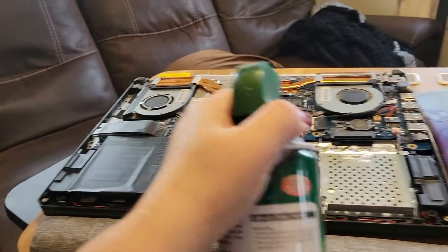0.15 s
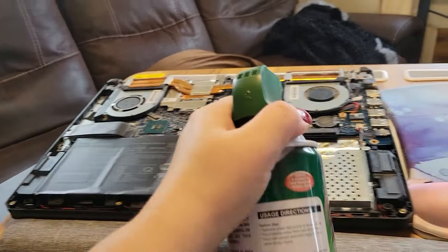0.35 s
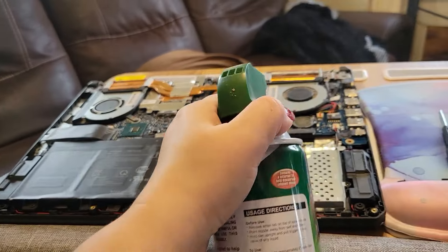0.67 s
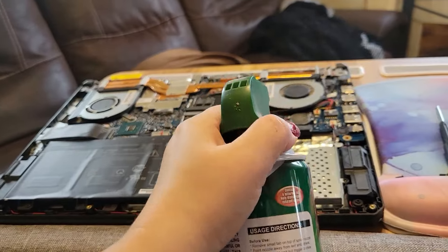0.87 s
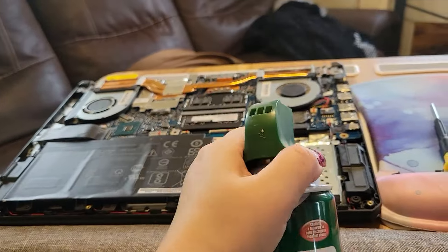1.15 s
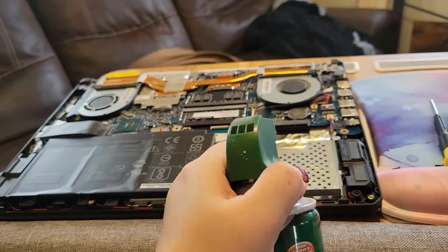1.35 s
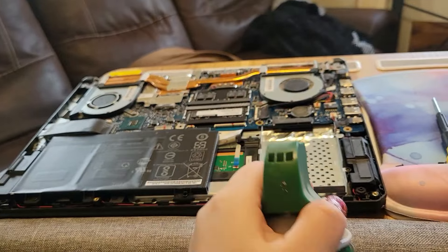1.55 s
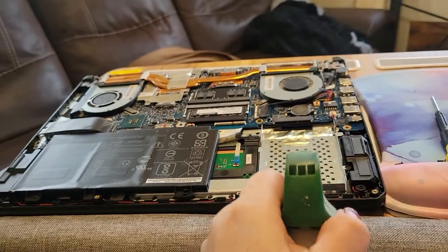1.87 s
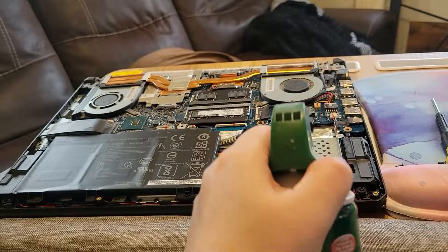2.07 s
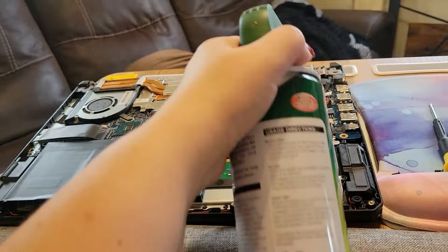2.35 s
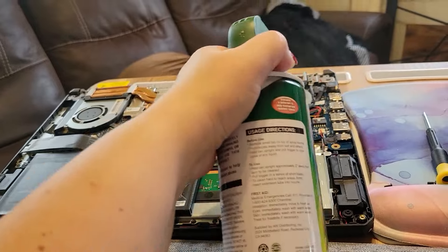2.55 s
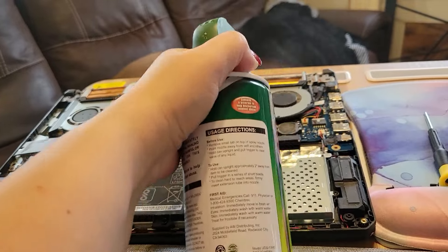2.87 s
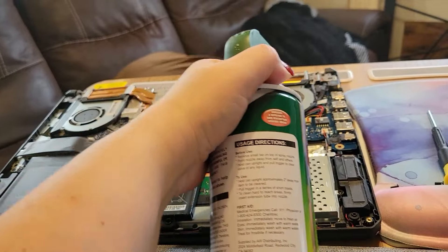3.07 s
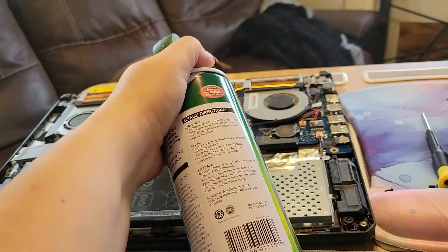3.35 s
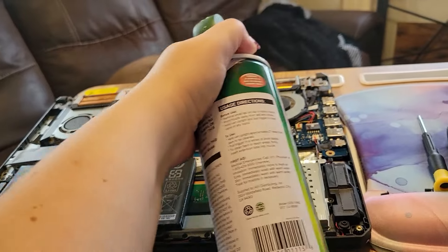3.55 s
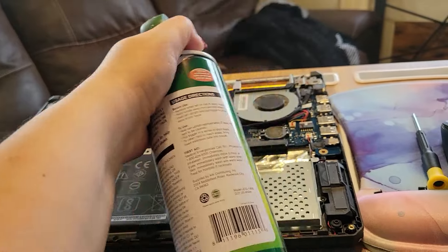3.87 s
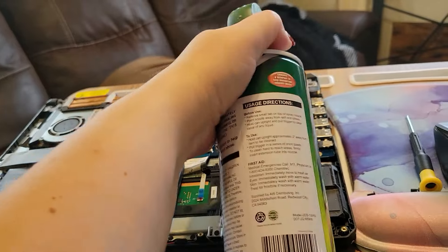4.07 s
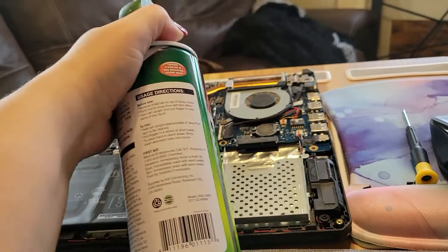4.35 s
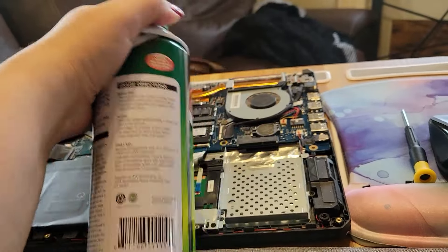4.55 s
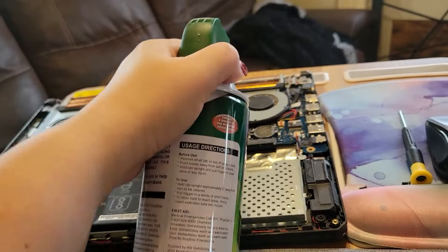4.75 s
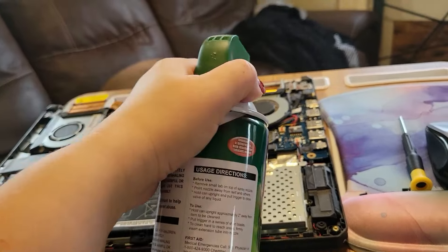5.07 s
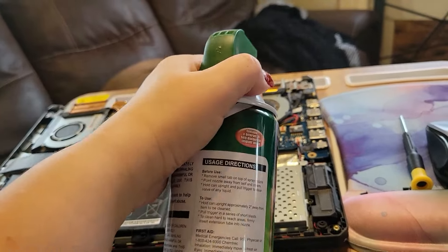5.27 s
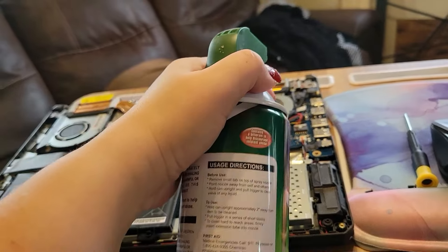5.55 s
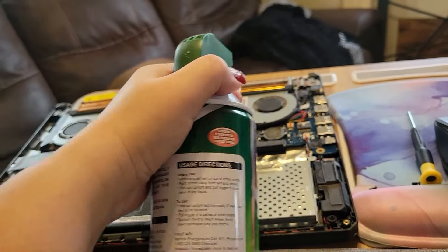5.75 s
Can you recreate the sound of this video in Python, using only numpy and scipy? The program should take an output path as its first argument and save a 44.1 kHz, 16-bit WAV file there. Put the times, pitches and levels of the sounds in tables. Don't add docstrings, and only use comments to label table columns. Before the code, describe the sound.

Very close stereo pickup of an air duster in a small furnished room. Short, bright, explosive hisses come a few times per second, each with a sharp onset and quick stop. After brief handling rustle, one longer blast wavers, weakens and surges. A pause follows, then five evenly spaced puffs. Small plastic clicks, soft low knocks and a faint room rumble sit beneath.

```python
import sys
import numpy as np
from scipy import signal
from scipy.fft import rfft, irfft
from scipy.io import wavfile
from scipy.ndimage import uniform_filter1d

SR = 44100
rng = np.random.default_rng(int(sys.argv[2]) if len(sys.argv) > 2 else 0)


def store_pcm(level_fs):
    pcm = np.round(np.clip(level_fs, -1, 1) * 32767).astype(np.int16)
    wavfile.write(sys.argv[1], SR, np.atleast_2d(pcm).T)


def ratio_of_db(decibels):
    return 10 ** (np.asarray(decibels, float) / 20)


N = 261072
FRAME = 256
BIN_HZ = np.maximum(np.arange(FRAME // 2 + 1) * SR / FRAME, 20)[:, None]

# freq_hz, difference_db
PORT_DIFFERENCE = [(300, 0), (1000, -1.5), (2500, -0.5), (4000, -6), (6000, -3), (8000, -8), (10000, -2.5),
                   (11500, -4), (13000, 1), (15500, -6.5)]
# freq_hz, share
SHARED = [(100, 1), (600, 0.94), (1500, 0.54), (3000, 0.47), (7000, 0.43), (15000, 0.17)]
# freq_hz, phase_rad
LEFT_LEADS = [(0, 0.26), (1030, 0.64), (1640, 0.1), (2150, 5.35), (5430, 7.67), (9130, 12.14),
              (14400, 17.5)]
# freq_hz, share
LOW_SHARED = [(60, .92), (300, .9), (700, .7), (1500, .15)]
GRIP_SHARED = [(20, .85), (100, 1.0)]
TOP_HZ = 15700

# freq_hz, density_db
RUMBLE_TONE = [(12, -31), (20, -4), (43, -15), (141, 5), (202, -4.5), (280, -33), (323, 0.5), (387, -19.5),
               (409, -25), (566, -11.5), (755, -42.5), (1320, -17), (1500, -34), (1950, -74), (3300, -120)]
# freq_hz, density_db
BUFFET_TONE = [(110, -12.0), (180, -2), (260, -2.5), (600, -13.0), (900, -23.0), (1500, -31.0)]
# freq_hz, density_db
GRIP_TONE = [(15, -16), (30, -1.5), (65, -1), (100, 6), (200, -50.5)]
# start_s, level_db
GUSTS = [
    (.3, -57.5),
    (1.95, -57),
    (3.761, -50),
    (4.83, -54),
]
# start_s, end_s, start_level_db, end_level_db
STIRS = [
    (.1, 0.424, -63.5, -55),
    (2.9, 3.398, -68.5, -59),
    (4.45, 4.82, -59.5, -55.5),
]
# start_s, peak_db, pitch_hz
THUMPS = [(0.477, -29.5, 98), (0.718, -33, 129), (0.999, -37, 88.8), (1.31, -35, 76.5), (1.649, -37, 61),
          (1.751, -38, 88.8), (1.909, -37, 51.1), (1.981, -34, 148), (2.134, -42, 55), (2.538, -35, 83.4),
          (2.818, -43, 155.5), (3.448, -40, 94), (4.719, -36, 122), (4.858, -43, 46.3), (5.109, -61, 132),
          (5.36, -36, 138), (5.609, -51, 35.0), (5.718, -35, 127), (5.879, -37, 127)]
RUMBLE_DB, GRIP_DB, GRIP_FADE_DB_PER_S = -56, -67.5, 53
BUFFET_LAG_S, BUFFET_RISE_DB_PER_S, BUFFET_FALL_DB_PER_S = 0.051, 315.5, 285
BUFFET_REST_DB, BUFFET_WELL_DB = -69.5, -56

# freq_hz, t60_s
ROOM_T60 = [(300, 0.091), (1000, 0.4), (3000, 0.47), (7000, 0.31), (11000, 0.28), (16000, 0.22)]
ROOM_DB = -13.5

# start_s, end_s, bright_start_db, bright_end_db, dull_re_bright_db
RUSTLE = [
    (0.0, 0.197, -48, -67.5, -19),
    (1.5, 1.625, -58, -48.5, -10.5),
    (2.33, 2.405, -53, -60, -26),
    (2.47, 2.52, -50.5, -55, -18),
    (3.036, 3.177, -48, -53.5, -16.5),
    (3.255, 3.423, -48, -54, -12.5),
    (4.36, 4.634, -65.5, -67, -10),
    (4.68, 4.83, -67.5, -62, -2.5),
]
# freq_hz, density_db
RUSTLE_TONE = [(1470, -34), (2500, -9.5), (3100, 1.5), (3380, -3.5), (6020, 0), (7480, 1), (9870, -9),
               (15800, -6.5)]
# freq_hz, density_db
RUB_TONE = [(550, -27.5), (800, -1.5), (1500, 2.0), (2200, 6), (3600, -26.5)]
RUSTLE_FADE_DB_PER_S = 305

# start_s, peak_db, pitch_hz, crack_db
TICKS = [
    (0.4244, -48.5, 3130, -48),
    (1.279, -37.5, 2770, -60),
    (1.565, -46, 1150, -43),
    (1.61, -35, 2760, -40),
    (2.4403, -53, 3730, -30.5),
    (2.473, -53.5, 2980, -31),
    (4.808, -37, 2870, -53),
]
TICK_GAIN, CONTACT_S = 1.3, 0.00054

# start_s, spurt_db, tumble_db
SPURTS = [(0.474, -11.5, -42), (.716, -12.5, -37), (0.996, -13, -40.5), (1.318, -13, -39),
          (1.645, -16, -38.5), (1.91, -14, -46.5), (2.142, -17, -40), (2.541, -23, -33.5),
          (2.816, -16, -38.5), (3.445, -20, -47.5), (4.859, -10, -40), (5.106, -12.5, -40),
          (5.355, -14, -39.5), (5.613, -13, -39.5), (5.876, -16.5, -36.5)]
# freq_hz, density_db
SPURT_TONE = [(500, -16.5), (1500, -14.0), (3000, 1.0), (5000, 2.0), (9000, 3), (15000, 7.5)]

# full_flow_s, open_s, hold_s, flow_db, top_hiss_re_flow_db (nozzle facing the microphone)
PUFFS = [(0.257, 0.022, 0.045, -21, 4), (0.462, 0.02, 0.077, -18.5, 3.5), (0.722, 0.034, 0.086, -18.5, 1.5),
         (.994, 0.026, 0.093, -19, 1), (1.32, 0.023, 0.086, -19, 1.5), (1.643, 0.018, 0.086, -18.5, -1),
         (1.91, 0.017, 0.063, -19, -0.5), (2.136, 0.011, 0.085, -19, -4.5),
         (2.539, 0.0078, 0.11, -16.5, -0.5), (2.819, .016, 0.094, -18, 1.5), (4.86, 0.017, 0.091, -18.5, 1),
         (5.104, 0.01, .09, -19.5, 4), (5.359, 0.015, 0.085, -18, 1.5), (5.613, 0.0075, 0.098, -20.5, 1.5),
         (5.875, 0.012, 0.037, -19.5, -0.5)]
# time_s, flow_db, top_hiss_re_flow_db
SWEEP = [
    (3.442, -20, 1),
    (3.502, -19, 0),
    (3.585, -23, 0),
    (3.672, -20, 2),
    (3.786, -27.5, 0.5),
    (3.886, -25.5, 3),
    (3.956, -18.5, -4),
    (3.983, -17, -2),
    (4.144, -21.5, 1),
]
# nozzle_db, board_db, roar_db, left_re_right_db
USUAL_DB = [-2, -8, -15, -4.5]
ZONE_HZ = [1800, 2750, 4500, 5500, 7800, 10500]
# freq_hz, density_db
JET_TONE = [(290, -25.5), (500, -18), (794, -19.5), (1010, -11), (1500, -11.5), (1860, -11.5), (3130, -8),
            (4000, -5), (6270, 0), (9810, -6), (15100, 1.5), (15800, -9)]
# pitch_hz, width_hz, left_db, right_db, extra_in_well_db
RINGS = [(1620, 440, 2, 2, 4), (3170, 560, 6, 6, 2.5), (4520, 1400, 5, 3, -4.5), (6260, 380, -2, 4.5, -2.5),
         (7300, 800, 3, 5.5, -1.2), (9000, 2700, 4, 2.14, 1.5), (12630, 590, 1, 7.5, -0.5),
         (16050, 2080, 6, 9, -2.5)]
FAN_WELL_S = (3.43, 4.25)
OPEN_S, SHUT_S = 0.055, 0.091
SWEEP_OPEN_S, SWEEP_CLOSE_S, SWEEP_CLOSE_DB = .014, 0.06, -14.5
LEAK_DB, CLOSE_S, CLOSE_DB = -32.5, .036, -24
SETTLE_S, SETTLE_DB, DIP_S = 0.028, -3, 0.011
TOP_SAG_DB = -1.1
BOARD_DB, ROAR_DB, PAN_DB = (-10.5, -8), (-14.5, -15.5), (-4, -2.5)
WELL_BOARD_DB, WELL_ROAR_DB, WELL_PAN_DB = -26.5, -36.5, -5.5
WELL_FLOW_DB, WELL_FOLLOWS = -22.5, .55
# nozzle_db, board_db, roar_db re top hiss, left_re_right_db
LEAKING, CLOSED = (0, -7.5, -14, -6.5), (-3, -2.1, -12, -5.5)
ROAR_FOLLOWS, TUMBLE_USUAL_DB = 0.2, -44.5

# freq_hz, rarity_spreads
DROPOUT = [(2500, 3), (3900, .9), (5400, 1.2), (7000, 3.5), (9000, 1.2), (10800, -.1), (12000, 1.2),
           (15000, 3)]
# freq_hz, share
COARSE = [(800, 0.022), (2000, 0.24), (4000, 0.41), (7000, 0.4), (9000, 0.49), (15000, 0.16)]
CUTOFF_HZ = 15760


def rms_one(x):
    return x / np.sqrt(np.mean(x ** 2) + 1e-20)


def at_hz(points, hz):
    table_hz, values = np.array(points).T
    return np.interp(np.log(hz), np.log(table_hz), values)


def coloured(spectrum, shared):
    hz = np.maximum(np.arange(N // 2 + 1) * SR / N, 5)
    both, left, right = rfft(rng.standard_normal((3, N)))
    share = np.clip(at_hz(shared, hz), 0, 1)
    late = both * np.exp(-1j * np.interp(hz, *np.transpose(LEFT_LEADS)))
    pair = np.sqrt(share) * np.array([both, late]) + np.sqrt(1 - share) * np.array([left, right])
    return rms_one(irfft(pair * ratio_of_db(at_hz(spectrum, np.minimum(hz, TOP_HZ))), N))


def patches(shape, bins, frames):
    field = uniform_filter1d(rng.standard_normal(shape), size=bins, axis=-2)
    return rms_one(uniform_filter1d(uniform_filter1d(field, size=frames, axis=-1), size=frames, axis=-1))


def drift(size):
    return rms_one(uniform_filter1d(uniform_filter1d(rng.standard_normal(N), size=size), size=size))


def swells(events, rise_db_per_s, fall_db_per_s):
    t = np.arange(N) / SR
    total = np.zeros(N)
    for a, b, a_db, b_db in events:
        levels_db = [a_db - rise_db_per_s, a_db, b_db, b_db - fall_db_per_s]
        total += ratio_of_db(np.interp(t, [a - 1, a, b, b + 1], levels_db))
    return total


def struck(events, cycles, soft_s):
    out, t = np.zeros(N + 6000), np.arange(6000) / SR
    for s, peak_db, hz, *_ in events:
        ring = np.sin(2 * np.pi * hz * t) * np.exp(-t * hz / cycles)
        out[round(s * SR):][:6000] += ratio_of_db(peak_db) * ring * np.tanh((t / soft_s) ** 2)
    return out[:N]


def rumble():
    steady = coloured(RUMBLE_TONE, LOW_SHARED) * ratio_of_db(RUMBLE_DB)
    tumbles = [(s + BUFFET_LAG_S, s + BUFFET_LAG_S, db, db) for s, _, db in SPURTS]
    tumbles.append((SWEEP[0][0], SWEEP[-1][0], BUFFET_WELL_DB, BUFFET_WELL_DB))
    air = swells(tumbles + STIRS, BUFFET_RISE_DB_PER_S, BUFFET_FALL_DB_PER_S)
    buffet = coloured(BUFFET_TONE, LOW_SHARED) * (ratio_of_db(BUFFET_REST_DB) + air)
    gusts = swells([(s, s, db, db) for s, db in GUSTS], GRIP_FADE_DB_PER_S, GRIP_FADE_DB_PER_S)
    grip = coloured(GRIP_TONE, GRIP_SHARED) * (ratio_of_db(GRIP_DB) + gusts) * ratio_of_db(1.4 * drift(size=1500))
    high_pass = signal.butter(2, 45., "high", fs=SR, output="sos")
    knocks = 1.4 * signal.sosfilt(high_pass, struck(THUMPS, cycles=0.7, soft_s=.0006))
    return steady + grip + knocks * ratio_of_db([[.8], [-.8]]) + buffet


def room(x):
    _, times, frames = signal.stft(rng.standard_normal((2, SR // 2)), SR, nperseg=FRAME)
    decay = ratio_of_db(-60 * times / at_hz(ROOM_T60, BIN_HZ))
    tail = signal.istft(frames * decay, SR, nperseg=FRAME)[1]
    tail = tail * np.clip(np.arange(tail.shape[1]) / SR / 0.015, 0, 1)
    tail = tail / np.sqrt(np.sum(tail ** 2, axis=1, keepdims=True))
    return ratio_of_db(ROOM_DB) * signal.fftconvolve(x, tail, axes=1)[:, :N]


def rustle():
    grain_db = 2.2 * drift(size=150) + 1.5 * drift(size=2000)
    fade = RUSTLE_FADE_DB_PER_S
    strokes = [r[:4] for r in RUSTLE]
    rubs = [(a, b, a_db + dull_db, b_db + dull_db) for a, b, a_db, b_db, dull_db in RUSTLE]
    bright = coloured(RUSTLE_TONE, SHARED) * swells(strokes, fade, fade) * ratio_of_db([[-1.5], [1.5]])
    dull = coloured(RUB_TONE, SHARED) * swells(rubs, fade, fade) * ratio_of_db(4.5)
    return (bright + dull) * ratio_of_db(grain_db)


def ticks():
    cracks, t = np.zeros(N + 900), np.arange(900) / SR
    for s, _, _, crack_db in TICKS:
        burst = np.diff(rng.standard_normal(901)) * np.exp(-t / 0.0041)
        cracks[round(s * SR):][:900] += ratio_of_db(crack_db - 12.0) * burst
    rings = struck(TICKS, cycles=3.5, soft_s=CONTACT_S)
    return (TICK_GAIN * rings + cracks[:N]) * ratio_of_db([[-2.5], [2.5]])


def spurts():
    level, t = np.zeros(N + 2000), np.arange(2000) / SR
    for s, top_db, _ in SPURTS:
        level[round(s * SR) - 130:][:2000] += ratio_of_db(top_db) * (t / 0.0026) ** 2 * np.exp(2 - 2 * t / 0.0036)
    return coloured(SPURT_TONE, SHARED) * level[:N] * ratio_of_db([[-2.5], [2.5]])


def puff(s, open_s, hold_s, flow_db, face_db):
    spurt_s, _, tumble_db = np.transpose(SPURTS)
    more_db = ROAR_FOLLOWS * (np.interp(s, spurt_s, tumble_db) - TUMBLE_USUAL_DB)
    ends = []
    for k, sag in enumerate((-0.5, 0.5)):
        f = face_db + sag * TOP_SAG_DB
        tone = (-f, BOARD_DB[k] - f, ROAR_DB[k] + more_db - f, PAN_DB[k])
        ends.append((s + k * hold_s, flow_db + f, *tone))
    (a, a_db, *start), end = ends
    return [(s - open_s, a_db + LEAK_DB, *LEAKING), (a, a_db - 1.0, *start),
            (a + DIP_S, a_db + SETTLE_DB, *start), (a + SETTLE_S, a_db, *start), end,
            (s + hold_s + CLOSE_S, flow_db + CLOSE_DB, *CLOSED)]


def sweep():
    swept = []
    for s, flow_db, f in SWEEP:
        well_db = WELL_FOLLOWS * (flow_db - WELL_FLOW_DB) - flow_db - f
        swept.append((s, flow_db + f, -f, WELL_BOARD_DB + well_db, WELL_ROAR_DB + well_db, WELL_PAN_DB))
    first, last = swept[0], swept[-1]
    return [(first[0] - SWEEP_OPEN_S, first[1] + LEAK_DB, *LEAKING), *swept,
            (last[0] + SWEEP_CLOSE_S, last[1] + SWEEP_CLOSE_DB, *last[2:])]


def squeezes(times):
    rows = []
    for q in sorted([puff(*p) for p in PUFFS] + [sweep()]):
        silent_before = (q[0][0] - OPEN_S, -100, *q[0][2:])
        silent_after = (q[-1][0] + SHUT_S, -100, *q[-1][2:])
        rows += [silent_before, *q, silent_after]
    s, *columns = np.transpose(rows)
    return [np.interp(times, np.maximum.accumulate(s), c) for c in columns]


def jet():
    hop = dict(nperseg=FRAME, noverlap=FRAME * 3 // 4)
    _, times, frames = signal.stft(coloured(JET_TONE, SHARED), SR, **hop)
    _, ring, board, roar, pan = squeezes(times)
    zones = np.array([roar - USUAL_DB[2], board - USUAL_DB[1], ring - USUAL_DB[0], 0 * pan])
    weights = np.array([np.interp(BIN_HZ[:, 0], ZONE_HZ, row[[0, 1, 1, 2, 2, 3]]) for row in np.eye(4)])
    side_db = at_hz(PORT_DIFFERENCE, BIN_HZ) + (pan - USUAL_DB[3]) * np.clip(BIN_HZ / 3700.0, 0, 1)
    tone_db = weights.T @ zones + side_db / 2 * np.array([1, -1])[:, None, None]
    in_well = (times > FAN_WELL_S[0]) & (times < FAN_WELL_S[1])
    for hz, width, left_db, right_db, well_db in RINGS:
        top_db = np.array([left_db, right_db])[:, None, None] + well_db * in_well
        tone_db = tone_db + top_db / (1 + (2 * (BIN_HZ - hz) / width) ** 2)
    ripple_db = 1.1 * patches(frames.shape, bins=2, frames=50)
    ripple_db += 1.8 * patches(frames.shape, bins=14, frames=12)
    hiss = rms_one(signal.istft(frames * ratio_of_db(tone_db + ripple_db), SR, **hop)[1][:, :N])
    flutter_db = 1.2 * drift(size=40) + 0.55 * drift(size=400)
    flow_db = squeezes(np.arange(N) / SR)[0]
    return hiss * ratio_of_db(flow_db + flutter_db + 5.5)


def scene():
    near = jet() + spurts() + ticks()
    return near + room(near) + rustle() + rumble()


def thinned(x):
    hz, _, frames = signal.stft(x, SR, nperseg=1024)
    table_hz = np.maximum(hz, 20)
    power = np.abs(frames) ** 2
    loud_db = 10 * np.log10(power.sum(axis=(0, 1)) + 1e-12)
    below_8k = hz[:, None] < 8000
    follows = np.where(hz[:, None] > 8000, 1, -.7)
    rarity = at_hz(DROPOUT, table_hz)[:, None] + .04 * (loud_db + 45) * follows + 1.0 * below_8k
    cells = patches((3, len(hz) // 10 + 1, len(loud_db) // 2 + 1), bins=1, frames=1)
    luck = .85 * cells[2] + .53 * cells[:2]
    luck = luck.repeat(10, axis=1).repeat(2, axis=2)[:, :len(hz), :len(loud_db)]
    kept = np.where(luck > rarity, .03, 1) * (hz[:, None] < CUTOFF_HZ)
    step = np.clip(at_hz(COARSE, table_hz), .01, 2)[:, None] * uniform_filter1d(power, size=16, axis=1)
    strong = power ** 2 / (power ** 2 + step ** 2 + 1e-30)
    return signal.istft(frames * kept * strong, SR, nperseg=1024)[1][:, :N]


def low_pass(x):
    return signal.sosfilt(signal.butter(12, 16590, fs=SR, output="sos"), x)


def record(dry):
    limited = 1.277 * dry / (1 + np.abs(dry) ** 5.4) ** (1 / 14.0)
    mix = np.clip(thinned(limited), -1, 1)
    return low_pass(mix)


dry = scene()
out = record(dry)
store_pcm(out)
```